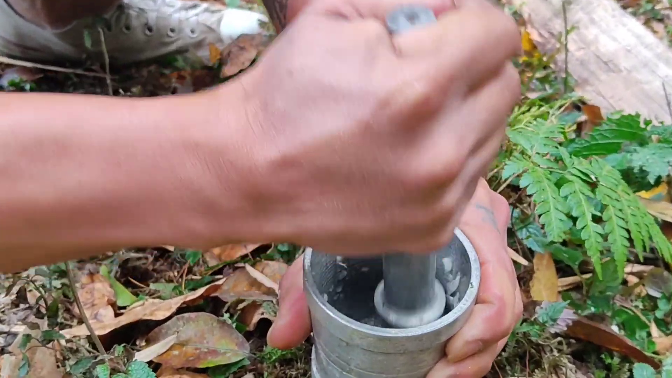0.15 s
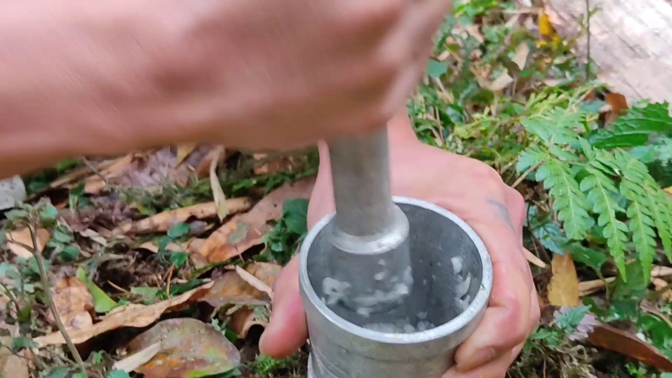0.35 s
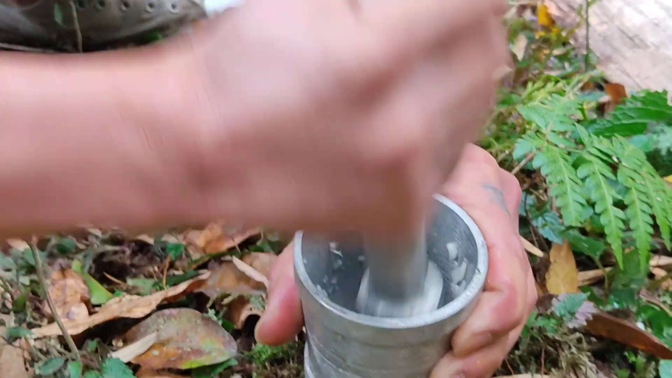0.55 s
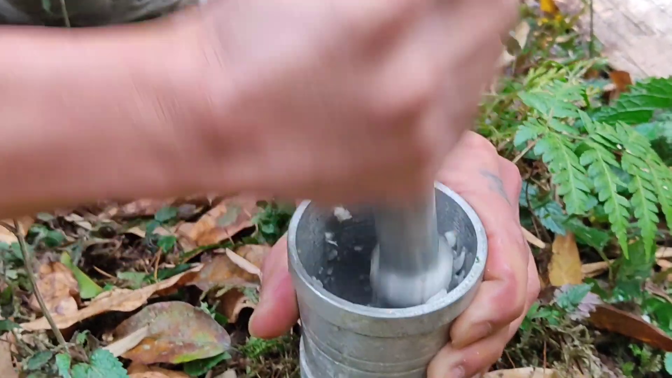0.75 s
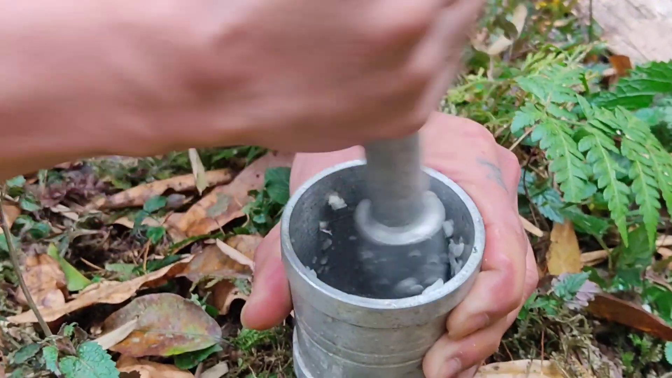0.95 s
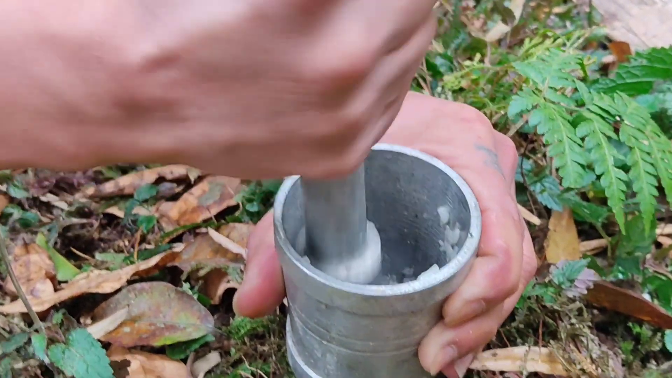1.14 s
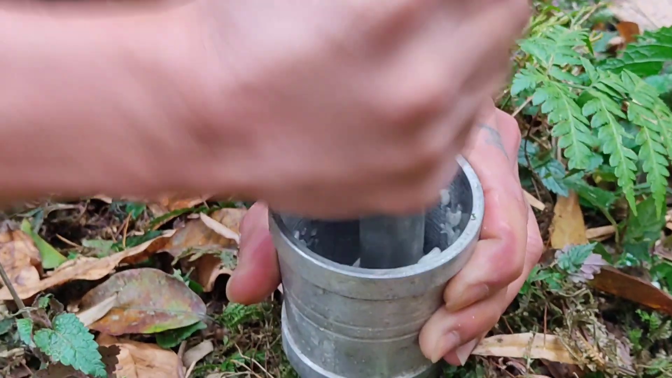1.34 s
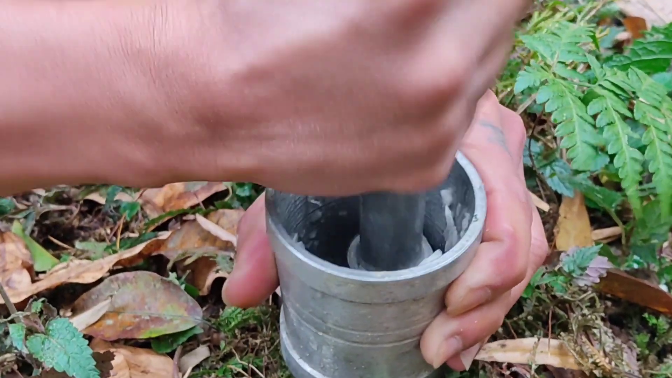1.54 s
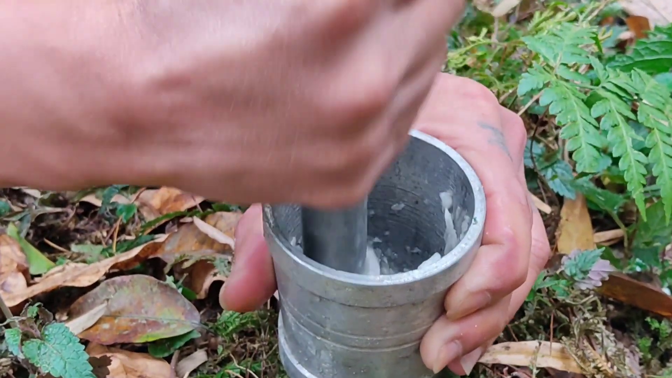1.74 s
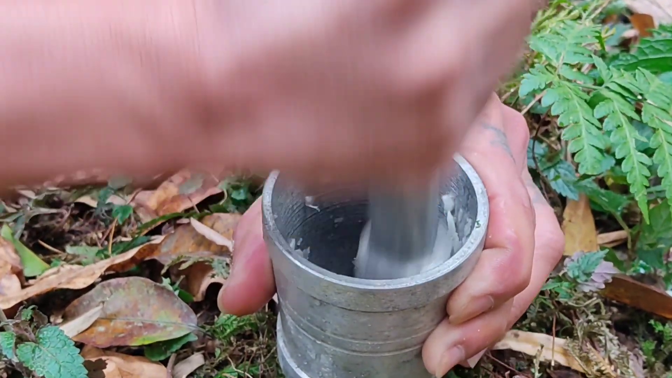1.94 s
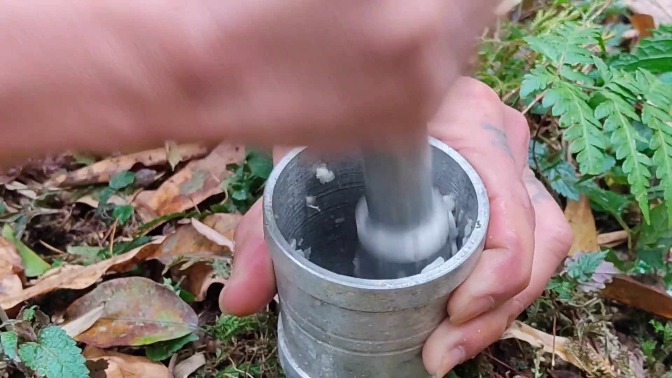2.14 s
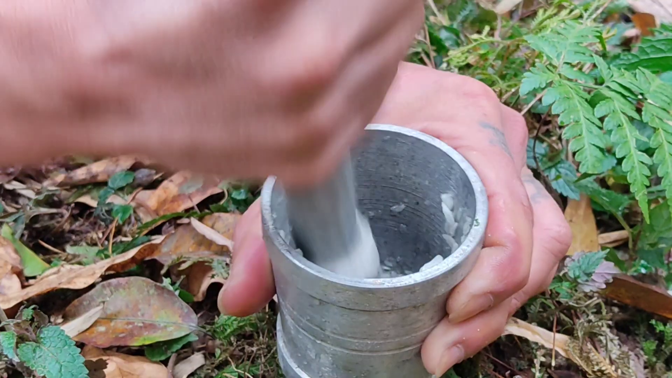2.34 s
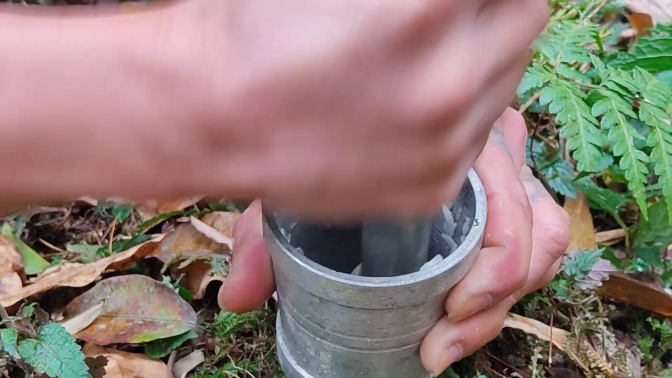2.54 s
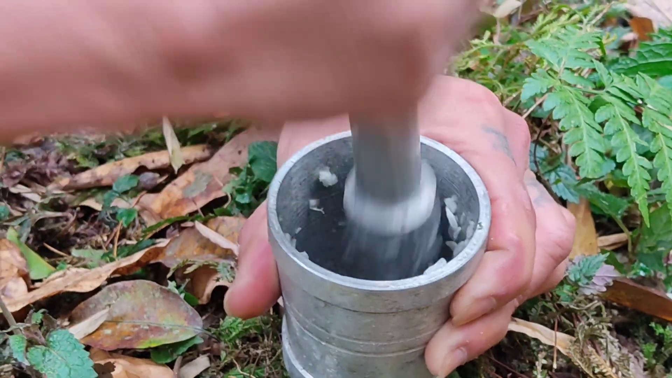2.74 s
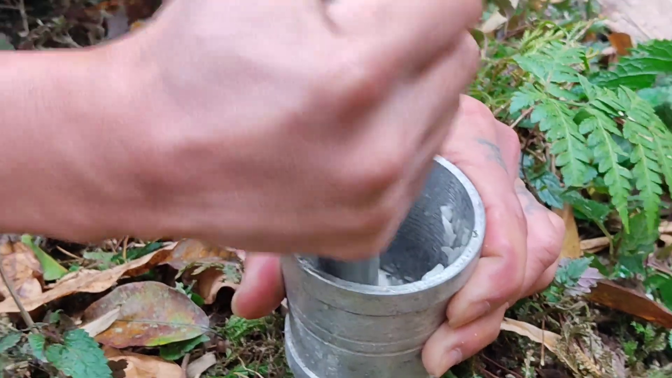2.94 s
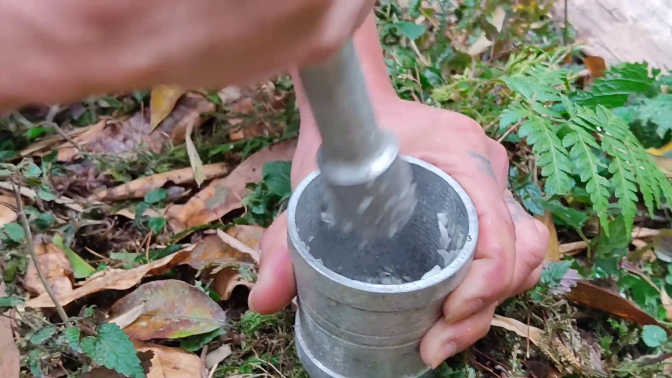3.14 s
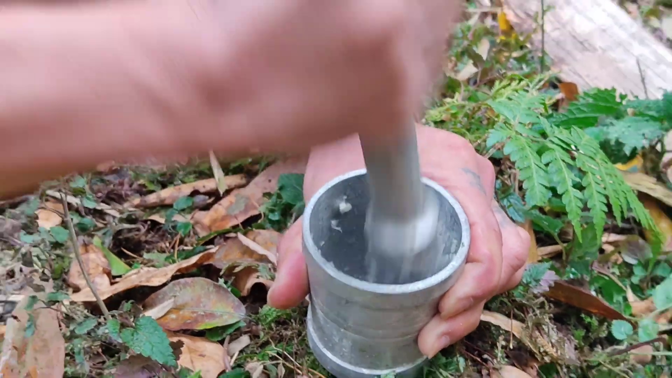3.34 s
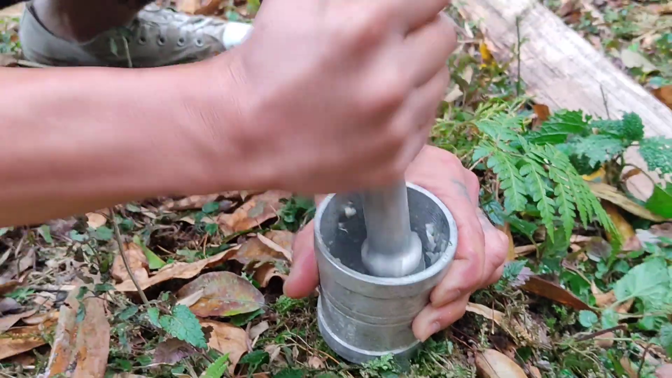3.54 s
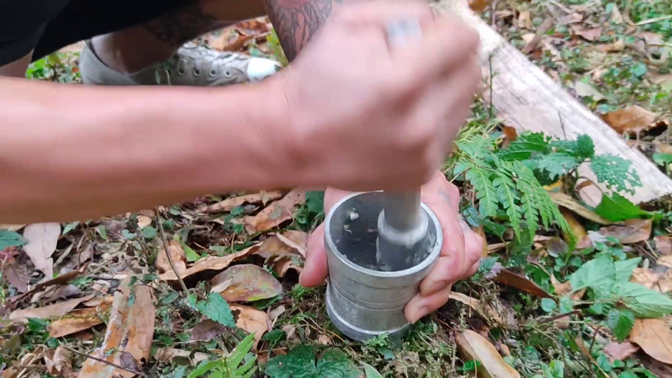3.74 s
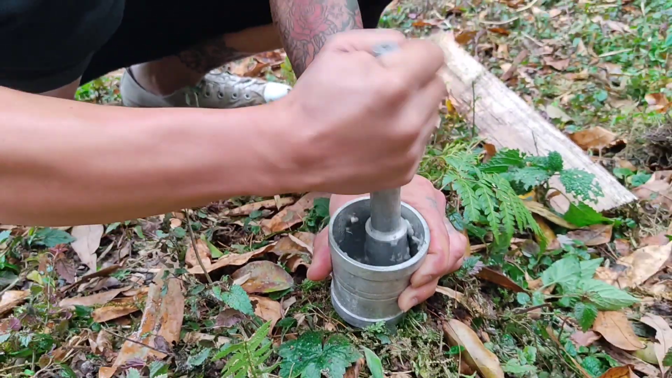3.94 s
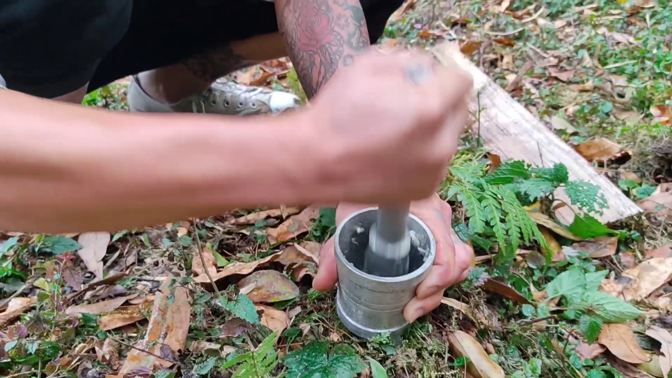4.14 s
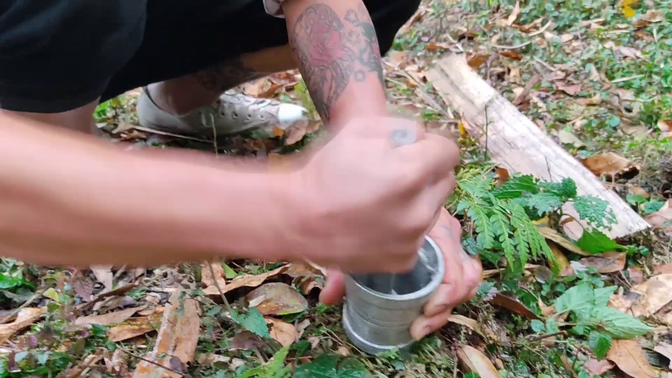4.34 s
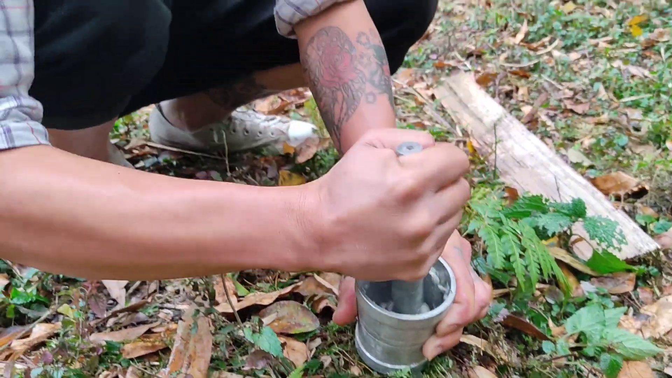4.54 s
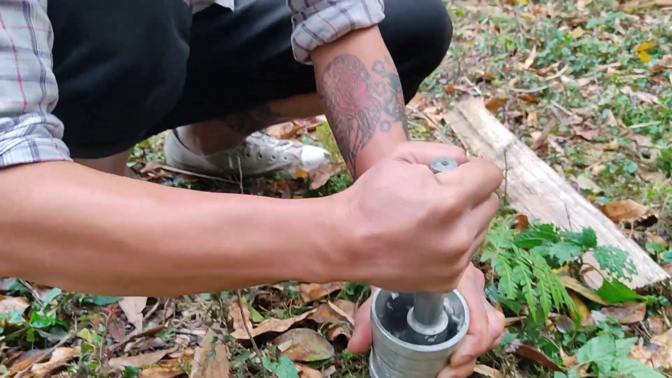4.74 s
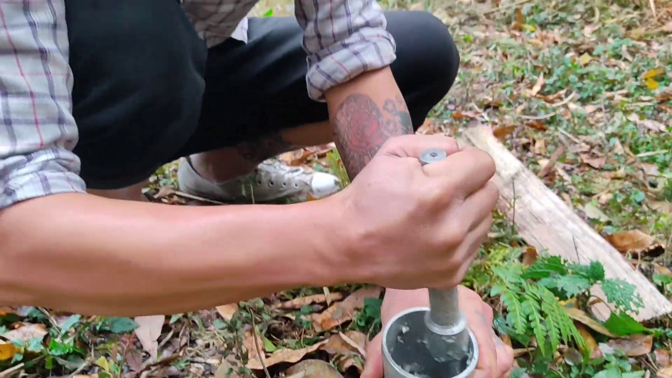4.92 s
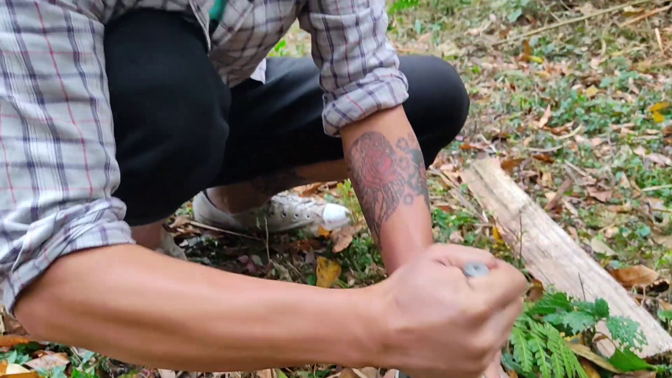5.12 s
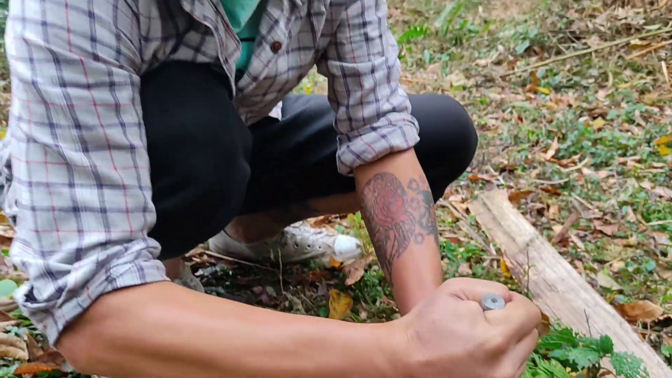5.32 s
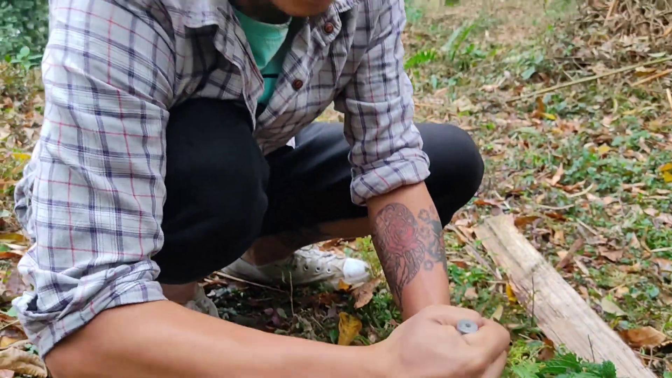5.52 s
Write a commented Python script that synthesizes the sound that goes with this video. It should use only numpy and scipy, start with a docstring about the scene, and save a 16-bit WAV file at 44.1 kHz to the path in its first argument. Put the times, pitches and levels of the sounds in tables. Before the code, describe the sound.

A metal pestle pounds garlic in a small hand-held metal mortar, quick hollow ringing knocks with scrapes and soft soil thuds, outdoors.

```python
"""On the leafy ground of a forest clearing, close to the microphones, garlic is pounded in a small hand-held mortar.
The pestle scrapes down the wall, strikes and rebounds: noisy contact forces ring short metal modes choked by hand
and garlic, the air in the cup rings hollow and low modes make the soil thud. The trees return decaying noise as
a faint wash over steady filtered hiss; sliding sines whistle as a far bird and a band of noise rustles."""
import sys
import numpy as np
from scipy import signal
from scipy.fft import rfft, irfft
from scipy.io import wavfile

SR = 44100
rng = np.random.default_rng(int(sys.argv[2]) if len(sys.argv) > 2 else 0)


def store_pcm(level_fs):
    """Save levels as 16-bit WAV."""
    pcm = np.round(np.clip(level_fs, -1, 1) * 32767).astype(np.int16)
    wavfile.write(sys.argv[1], SR, np.atleast_2d(pcm).T)


N = 250267
TIME = np.arange(int(.25 * SR)) / SR  # time axis of one ring, s
BLOW_S = .02  # nominal length of a blow, over which its levels are reckoned
HOLLOW_TOP_HZ, WALL_TOP_HZ = 1200, 5000  # upper edges of the base and wall modes

# Strokes down to the bottom of the cup: t/s, force level/dB, garlic under the pestle/0-1,
# hollow ring against force/dB, level of the slide on the way down/dB
STROKES = [(0.0488, -17.5, 0.22, -8.5, -34.5), (0.2247, -23, 0.07, 8.5, -43.5),
           (0.608, -21.5, 0.53, -6, -38), (.791, -20.5, 0.12, 1.5, -26), (.97, -21, 0.17, 2, -35.5),
           (1.148, -15, 0.66, -14.5, -35), (1.3044, -23.5, 0.11, 4, -51.5), (1.462, -25.5, 0.08, 5, -38.5),
           (1.6393, -15, 0.36, -5.5, -29), (1.826, -18.5, 0.28, -4.5, -39.5),
           (1.9836, -18.5, 0.35, 2.5, -37), (2.1465, -18.5, 0.24, -4, -38), (2.3374, -20.5, 1, -13.5, -42),
           (2.494, -20, 0.71, -18, -61), (2.6433, -20, 0.15, 2.5, -38), (2.8072, -19, 0.5, 0, -41.5),
           (2.977, -18, 0.36, -5.5, -33.5), (3.5441, -23.5, 0.46, -18, -28.5),
           (3.7235, -20, 0.1, 1.5, -31.5), (3.9601, -18.5, 0.65, -4.5, -27.5),
           (4.1277, -17.5, 0.19, 1.5, -41.5), (4.475, -19.5, 0.24, 5, -31.5),
           (4.6439, -24.5, 0.12, 11, -47.5), (4.7394, -23, 0.1, 8.5, -47.5),
           (5.1551, -20.5, 0.53, 3, -21.5), (5.3304, -19, .15, 2, -33.5), (5.5016, -26, .93, -0.5, -57),
           (5.6156, -22.5, 0.85, -1.5, -45.5)]
# After a high lift the pestle hits the wall first and grinds along it: t/s, force level/dB,
# hollow ring against force/dB, grind length/s, grind level/dB
GLANCES = [(0.5474, -20, -7, 0.027, -28), (2.8584, -18.5, -23, 0.052, -39),
           (3.4673, -18.5, -5.5, 0.051, -23), (3.6749, -29.5, -22, 0.033, -28.5),
           (4.4168, -16, -12.5, .034, -20), (5.0655, -24.5, -18.5, 0.066, -35)]


def undb(db):
    """Decibels to amplitude gain."""
    return 10 ** (np.asarray(db) / 20)


def level(x, db, seconds):
    """Give x the energy of a sound of this RMS level and length."""
    energy = np.sum(x ** 2, axis=-1, keepdims=True) + 1e-18
    return x * undb(db) * np.sqrt(seconds * SR / energy)


def add(out, start, x):
    """Mix x into both channels from a start time in seconds."""
    i = max(int(start * SR), 0)
    out[:, i:i + x.shape[-1]] += x[..., :N - i]


def colour(x, points):
    """Filter by a curve of f/Hz and gain/dB, interpolated over log frequency."""
    hz, db = np.transpose(points)
    f = np.maximum(np.fft.rfftfreq(2 * N, 1 / SR), 1)
    gain = undb(np.interp(np.log(f), np.log(hz), db))
    return irfft(rfft(x, 2 * N) * gain)[..., :N]


def cut(x, hz, kind, order=4):
    """Keep what lies below, above or between the given edges."""
    return signal.sosfilt(signal.butter(order, hz, kind, fs=SR, output="sos"), x)


def pair(size, apart):
    """Two noises that share all but the part 'apart' of their power."""
    shared, left, right = rng.standard_normal((3, size))
    apart = np.clip(apart, 0, 1)
    return np.sqrt(1 - apart) * shared + np.sqrt(apart) * np.array([left, right])


def chance(size, per_s):
    """Random values, per_s of them a second, joined by straight lines."""
    steps = np.arange(size) * per_s / SR
    return np.interp(steps, np.arange(size), rng.standard_normal(size))


def forest(flutter_db=.6):
    """A soft hiss of foliage: wide coloured noise that wavers a little."""
    # Colour of the hiss: f/Hz, relative level/dB
    foliage = [(25, 9.5), (80, 4.5), (200, -2.5), (500, -2), (750, -6), (1800, -7.5), (3200, -9.5),
               (5000, -16), (7000, -9), (8600, 1), (10000, -17.5), (15000, -29.5)]
    air_db = -54.5
    hiss = level(colour(pair(N, apart=0.95), foliage), air_db, N / SR)
    return hiss * undb(flutter_db * chance(N, per_s=10.0))


def ring(hz, t60):
    """One damped mode: a sine that falls by 60 dB in t60 seconds."""
    return np.sin(2 * np.pi * hz * TIME) * undb(-60 * TIME / t60)


def mortar(force, lo_hz, hi_hz, rubbed=False, scatter_db=0, detune=0):
    """A force rings the metal modes of one range; where the pestle touches changes their shares and pitches."""
    # Metal of mortar and pestle, choked by the hands, before scatter and detuning:
    # f/Hz, t60/s, relative level struck/dB, relative level rubbed/dB
    metal_modes = [(494, 0.02, 4, -17.5), (745, 0.032, -1, 10.5), (1338, 0.0084, -2.5, -7.5),
                   (1685, 0.014, -7.5, -18), (2363, 0.012, -3.5, -6), (2657, 0.015, -2, -5),
                   (2995, .015, -5.5, -9.5), (3572, 0.0095, -4, -2.5), (4177, 0.006, -6.5, -14),
                   (5836, 0.015, -9.5, 1), (6880, 0.012, 2, 1.5), (7610, 0.0053, 8.5, 1.5),
                   (8470, 0.0087, 6.5, 2.5), (9137, 0.013, 0, -3.5), (10510, 0.005, -16, -6),
                   (15100, 0.013, -27, -38)]
    response = 0
    for hz, t60, struck_db, rubbed_db in metal_modes:
        if lo_hz <= hz < hi_hz:
            db = (rubbed_db if rubbed else struck_db) + scatter_db * rng.standard_normal()
            shifted_hz = hz * (1 + detune * rng.standard_normal())
            mode = level(ring(shifted_hz, t60), db, BLOW_S)
            # upper modes start upward or downward at random
            sign = 1 if hz < HOLLOW_TOP_HZ else rng.choice([-1, 1])
            response = response + mode * sign
    return signal.fftconvolve(force, response[None], axes=-1)


def cup(force, pitch, detune, choke=0):
    """The air beside the pestle takes a few cycles to swing up, then dies quickly, sooner when garlic chokes it."""
    open_hz, open_t60_s, swell_s = 1115, 0.015, 0.0056  # before pitch and choke
    hz = open_hz * pitch * (1 + detune * rng.standard_normal())
    air = ring(hz, open_t60_s / (1 + choke)) * (1 - np.exp(-TIME / swell_s)) ** 2
    return signal.fftconvolve(force, air[None], axes=-1)


def rubs():
    """The pestle rubs the wall before each blow, after a glancing hit and on the way up: (start, end, dB)."""
    # The pestle brushes the wall as it is lifted: t/s, level/dB
    brushes = [(.143, -35.5), (.875, -44.5), (1.048, -42), (1.385, -43), (1.545, -30.5), (2.247, -44),
               (2.702, -41.5), (3.607, -44), (3.861, -35), (4.045, -39.5), (4.667, -43), (5.271, -44)]
    lead_s, clear_s, brush_s = .039, .005, .034  # slide starts and lets go before its blow; brush length
    grind_delay_s = .009  # the glancing knock dies before the grind takes hold
    down = [(t - lead_s, t - clear_s, db) for t, *_, db in STROKES]
    along = [(t + grind_delay_s, t + grind_delay_s + length, db) for t, *_, length, db in GLANCES]
    up = [(t, t + brush_s, db) for t, db in brushes]
    return down + along + up


def scrapes(grit_db=6, chatter_db=4.5, edge_s=.011):
    """Stick and slip, under a chattering grip, rubs the same modes; the raised pestle lowers the hollow tone."""
    firm_db = -28.5  # level of a firm scrape
    wall_rub_db, hiss_share_db = 1.5, -6  # shares against the body of a firm scrape
    hiss_growth = 0.47  # lighter touches lose hiss faster than body, dB per dB
    out = np.zeros((2, N))
    for start, end, body_db in rubs():
        firmness_db = body_db - firm_db
        hiss_db = body_db + hiss_share_db + hiss_growth * firmness_db
        length = max(end - start, BLOW_S / 2)
        t = np.arange(int((length + edge_s) * SR)) / SR
        edges = np.clip(np.minimum(t, t[-1] - t) / edge_s, 0, 1)
        # the pestle gathers speed as it slides
        pressure = edges * (1 + .5 * t / length)
        grit = grit_db * chance(len(t), per_s=1300)
        chatter = chatter_db * chance(len(t), per_s=221.6)
        force = pair(len(t), apart=0.73) * pressure * undb(grit + chatter)

        air = level(cup(force, pitch=0.928, detune=0.032), -2.0, length)
        base = level(mortar(force, 0, HOLLOW_TOP_HZ, rubbed=True, detune=0.041), -14.5, length)
        # a light touch glides on garlic and hardly stirs the wall
        bite_db = min(0.55 * firmness_db, 0)
        wall = mortar(force, HOLLOW_TOP_HZ, WALL_TOP_HZ, rubbed=True, scatter_db=2.0, detune=0.027)
        wall = level(wall, bite_db + wall_rub_db, length)
        hiss = mortar(force, WALL_TOP_HZ, SR, rubbed=True, scatter_db=2.5, detune=0.07)
        body = undb(body_db) * (air + base + wall)
        add(out, start - edge_s / 2, body + level(hiss, hiss_db, length))
    return cut(out, 11000, "low", order=8)


def contacts():
    """Garlic mutes the wall; glances and taps hardly reach the soil: (start, thud, hollow, wall, clink, pan)."""
    # The pestle rattles lightly against the wall just before or after a stroke: t/s, level/dB
    taps = [(.068, -26.5), (0.8066, -33.5), (1.1773, -48.5), (1.3217, -36), (1.961, -38), (2.001, -29.5),
            (2.656, -34.5), (2.8242, -47), (3.7399, -37.5), (4.627, -33), (4.6634, -33.5), (4.759, -42)]
    # shares against the force of a blow, dB; a full pad of garlic mutes the wall by cushion_db
    thud_db, bare_wall_db, cushion_db = -11.5, 9, -40.5
    glance_thud_db, glance_wall_db, glance_pan_db = -29.5, -4.5, -2
    # the clink, left minus right in dB, on bare metal and once garlic covers the bottom
    bare_pan_db, padded_pan_db, covered = -10, 3, 0.46
    # shares of a light tap against its ring in the wall, dB
    tap_thud_db, tap_hollow_db, tap_clink_db = -23, -11.5, -5.5

    for start, force_db, garlic, hollow_db, _ in STROKES:
        wall_db = bare_wall_db + cushion_db * garlic
        pan_db = bare_pan_db + (padded_pan_db - bare_pan_db) * min(garlic / covered, 1)
        yield start, *(force_db + np.array([thud_db, hollow_db, wall_db, 0])), pan_db
    for start, force_db, hollow_db, _, _ in GLANCES:
        yield start, *(force_db + np.array([glance_thud_db, hollow_db, glance_wall_db, 0])), glance_pan_db
    for start, db in taps:
        yield start, *(db + np.array([tap_thud_db, tap_hollow_db, 0, tap_clink_db])), 0


def crush(decay_s, apart, rise_s=0.00081):
    """Tiny contacts as the pestle breaks through to the metal; together they fill the spectrum fairly evenly."""
    t = TIME[:SR // 40]
    envelope = np.exp(-t / decay_s) * (1 - np.exp(-t / rise_s)) ** 2
    burst = rfft(pair(len(t), apart) * envelope)
    even = irfft(burst / np.abs(burst) ** .7, len(t))  # flatten most of the spectrum
    return even * np.exp(-(t / (BLOW_S / 2)) ** 2)


def soil(loose_db=-9, loose_t60=0.21):
    """The knock of the base, the bounce of the ground and the rumble of loose earth."""
    # The base knocks, then settles into the soil: delay t/s, f/Hz before detuning, t60/s, relative level/dB
    ground_modes = [(.002, 610, 0.014, -1), (.0028, 364, 0.016, 4.5), (0.0035, 90, 0.04, -12),
                    (0.015, 168, 0.061, -9.5), (0.013, 92, 0.1, -14.5)]
    bounce = 0
    for delay, hz, t60, db in ground_modes:
        mode = ring(hz * (1 + 0.016 * rng.standard_normal()), t60)
        bounce = bounce + undb(db) * np.interp(TIME - delay, TIME, mode)
    earth = cut(rng.standard_normal(len(TIME)) * undb(-60 * TIME / loose_t60), 150, "low")
    return level(bounce, 0, BLOW_S) + level(earth, loose_db, BLOW_S)


def blows():
    """Each blow clinks, rings the wall, pumps the air in the cup and drives the mortar into the soil."""
    out = np.zeros((2, N))
    for start, thud_db, hollow_db, wall_db, clink_db, pan_db in contacts():
        push = 0.6 * crush(decay_s=0.0018, apart=0.085)
        push[:, int(.0005 * SR)] += 1  # one sharp shove among the small contacts
        # the weaker the hollow ring beside the thud, the more it is choked
        cushion = min(undb(thud_db - hollow_db), 1) ** 2
        hollow = cup(push, pitch=0.97, detune=0.014, choke=cushion)
        add(out, start, level(hollow, hollow_db, BLOW_S))
        # a blow cushioned by garlic rings little and gives a dull knock instead
        knock_db = max(hollow_db - 14.5, thud_db - 4.0)
        knock = mortar(push, 0, HOLLOW_TOP_HZ, detune=0.087)
        add(out, start, level(knock, knock_db, BLOW_S))

        wall_force = crush(decay_s=0.0012, apart=0.26)
        wall = mortar(wall_force, HOLLOW_TOP_HZ, WALL_TOP_HZ, scatter_db=3.0, detune=0.03)
        add(out, start - .0003, level(wall, wall_db, BLOW_S))
        # the metal contact is over in a moment; it leans right on bare metal, left once garlic covers the bottom
        clink = mortar(crush(decay_s=0.00078, apart=0.43), WALL_TOP_HZ, SR, detune=0.023)
        balance = undb([[0], [-pan_db]])  # left, right
        add(out, start - .0004, level(clink, clink_db, BLOW_S) * balance)
        add(out, start, level(soil(), thud_db, BLOW_S))
    return out


def trees(x, t60, db):
    """Scattered returns from ground, trunks and leaves: x convolved with decaying noise."""
    t = np.arange(SR) / SR
    tail = rng.standard_normal((2, SR)) * undb(-60 * t / t60) * (1 - np.exp(-t / 0.002))
    return signal.fftconvolve(x, level(tail, db, 1 / SR), axes=-1)[:, :N]


def wash(x, lo_hz, hi_hz, t60, db):
    """Countless returns blur one band into a diffuse sound whose energy dies away."""
    # Colour of what the trees send back: f/Hz, relative level/dB
    tree_colour = [(300, -16), (780, -23), (1090, 6.5), (1330, -8.5), (2000, 2), (2700, -5), (4000, -10.5),
                   (5200, -22.5), (6900, 0), (8300, -7), (10000, -22), (15000, -31)]
    t = np.arange(SR) / SR
    decay = undb(-120 * t / t60) * (1 - np.exp(-t / .012))  # of power, so 60 dB in t60
    power = np.mean(cut(x, [lo_hz, hi_hz], "band") ** 2, axis=0)
    energy = np.abs(signal.fftconvolve(power, decay / decay.sum())[:N])
    diffuse = cut(colour(pair(N, apart=0.99), tree_colour), [lo_hz, hi_hz], "band")
    return level(diffuse, db, N / SR) * np.sqrt(energy)


def bird(waver_db=4.5, trill_hz=45):
    """Thin whistles that slide and level off, wavering on their way through the trees."""
    # Slurred whistles, before the distance is mixed in: start t/s, length/s, first f/Hz, last f/Hz, level/dB
    whistles = [(1.662, 0.47, 3220, 3280, -61), (2.374, 0.24, 3500, 3205, -57.5),
                (2.582, 0.27, 3310, 3140, -57), (2.969, 0.17, 3280, 3204, -55),
                (3.109, .15, 3265, 2815, -53.5), (3.299, 0.15, 2780, 2840, -65)]
    out = np.zeros((2, N))
    for start, length, first_hz, last_hz, db in whistles:
        u = np.linspace(0, 1, int(length * SR))  # progress through the whistle
        slide_hz = last_hz + (first_hz - last_hz) * (1 - u) ** 2
        hz = slide_hz + trill_hz * chance(len(u), per_s=70.5)
        swell = np.sqrt(u * (1 - u)) * undb(waver_db * chance(len(u), per_s=45))
        tone = np.sin(2 * np.pi * np.cumsum(hz) / SR)
        add(out, start, level(tone * swell, db, length))
    return out


def rustle(flicker_db=2.0):
    """A thin, high band of noise that swells quickly once and ebbs."""
    # The one rustle: start t/s, length/s, level/dB
    swelling = (5.1, 0.86, -52.5)
    band_hz, rise_s, decay_s = (6470, 9300), 0.066, 0.45
    out = np.zeros((2, N))
    start, length, db = swelling
    t = np.arange(int(length * SR)) / SR
    swell = np.minimum(t / rise_s, 1) * np.exp(-t / decay_s)
    flicker = undb(flicker_db * chance(len(t), per_s=25))
    noise = cut(pair(len(t), apart=.8), band_hz, "band")
    add(out, start, level(noise * swell * flicker, db, length))
    return out


def scene():
    """The mortar close by, its wash among the trees, the far bird, the hiss and the rustle."""
    near = blows() + scrapes()
    returns = trees(near, t60=0.066, db=-19.5)
    far = wash(near, 300, 1500, t60=0.79, db=-31.5)
    far = far + wash(near, 2500, 5400, t60=0.72, db=-28)
    far = far + wash(near, 5000, 11000, t60=0.42, db=-29.5)
    song = bird()
    # the far bird is heard more through the trees than directly
    distant_song = undb(-7.5) * song + trees(song, t60=0.71, db=-2.5)
    return near + returns + far + distant_song + forest() + rustle()


def record(dry):
    """Two unlike microphone ports, the right a little earlier; no deep bass, loudest peaks rounded, top cut."""
    # Colour of the right port, which hears less bass: f/Hz, level against the left/dB
    right_port = [(60, -15), (350, -9.5), (750, -4), (1100, -9.5), (1600, -5.5), (2600, -3), (4000, -2.5),
                  (5000, 3), (6400, 7.5), (7200, -1.5), (8500, -14.5), (11000, -4.5), (14000, -4.5)]
    lead_s, low_hz, top_hz = .000068, 47, 15700  # lead of the right port, edges of the range
    samples = np.arange(N)
    right = np.interp(samples + lead_s * SR, samples, colour(dry[1], right_port))
    both = cut(np.array([dry[0], right]), low_hz, "high", order=2)
    rounded = both / (1 + both ** 4) ** .25
    return signal.sosfilt(signal.ellip(10, .2, 90, top_hz, fs=SR, output="sos"), rounded)


dry = scene()
out = record(dry)
store_pcm(out)
```